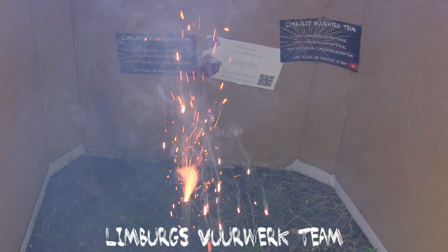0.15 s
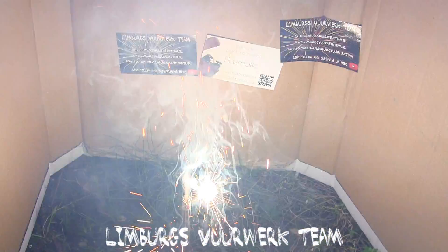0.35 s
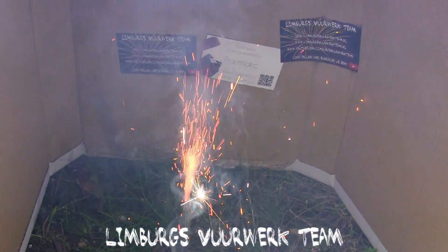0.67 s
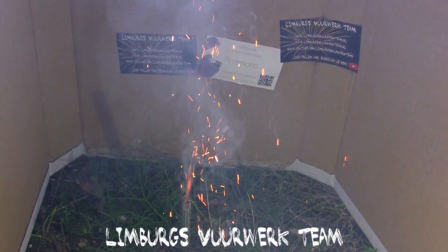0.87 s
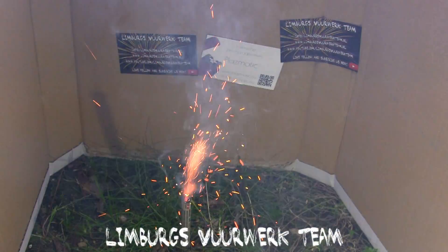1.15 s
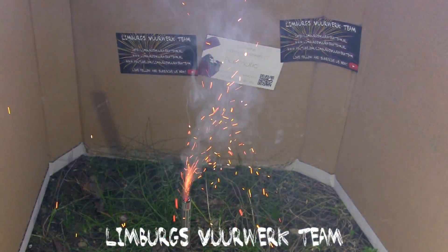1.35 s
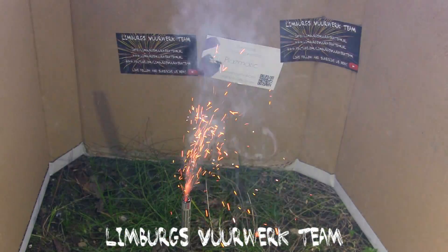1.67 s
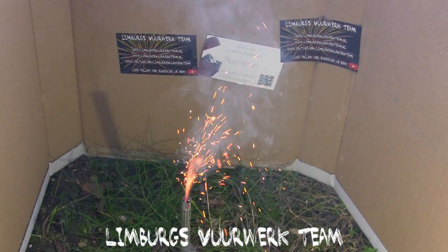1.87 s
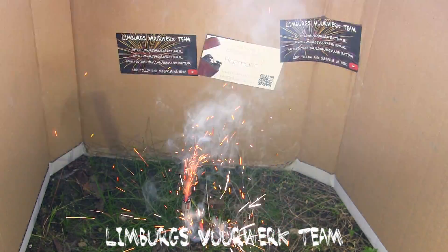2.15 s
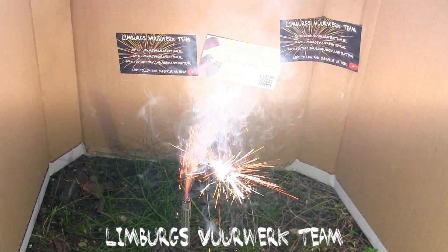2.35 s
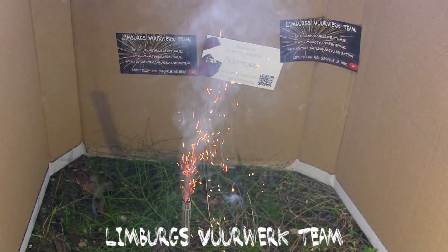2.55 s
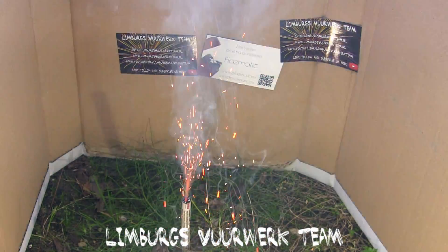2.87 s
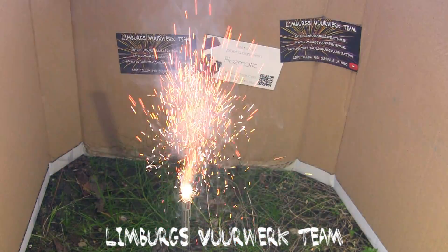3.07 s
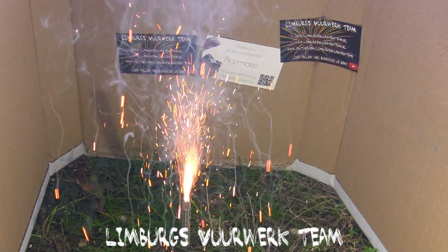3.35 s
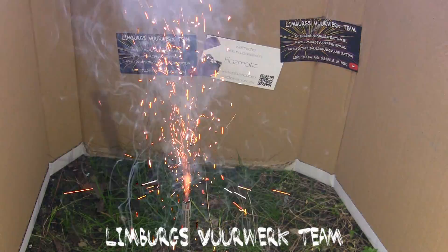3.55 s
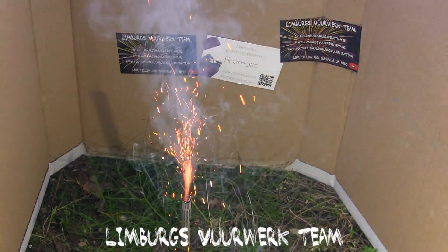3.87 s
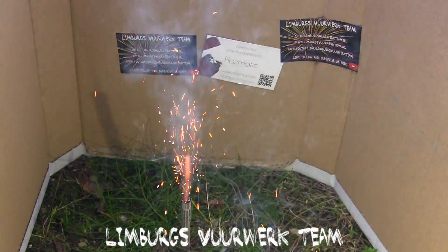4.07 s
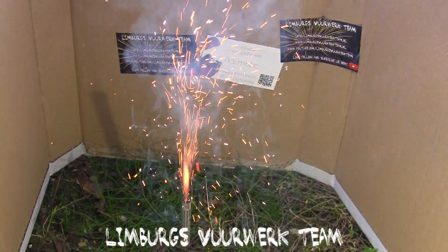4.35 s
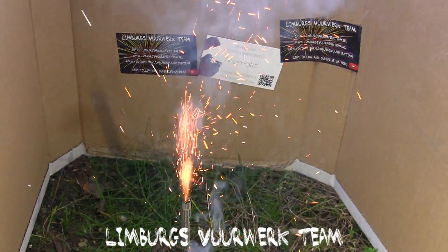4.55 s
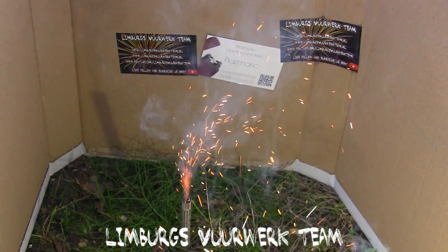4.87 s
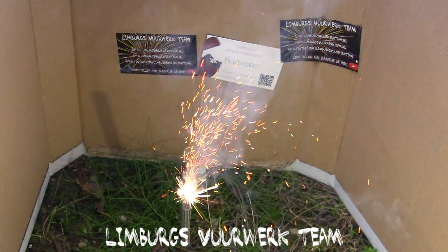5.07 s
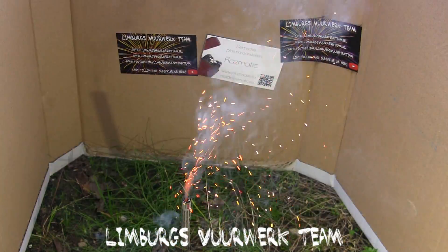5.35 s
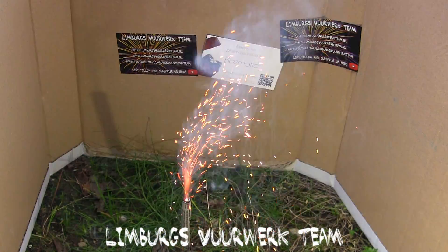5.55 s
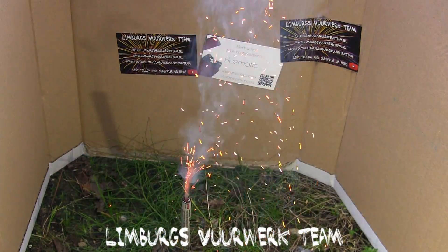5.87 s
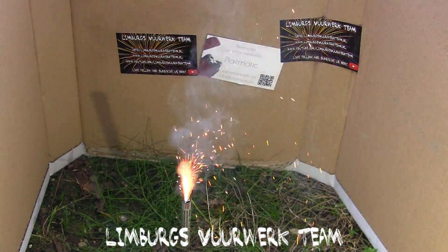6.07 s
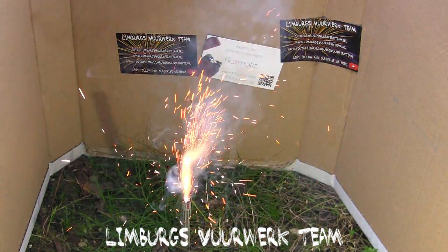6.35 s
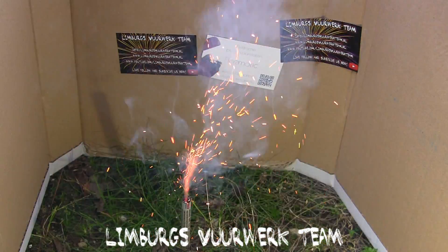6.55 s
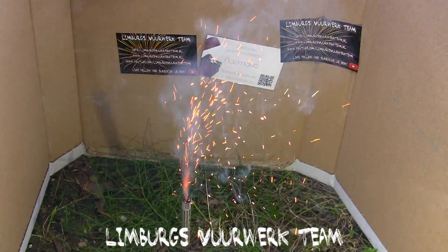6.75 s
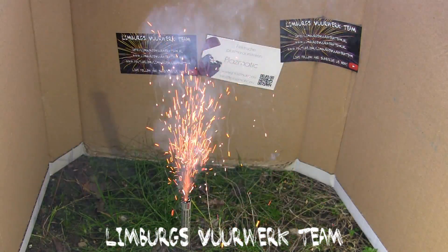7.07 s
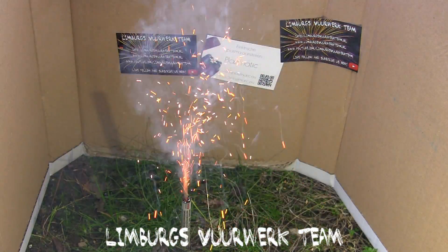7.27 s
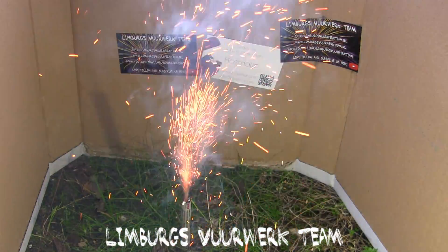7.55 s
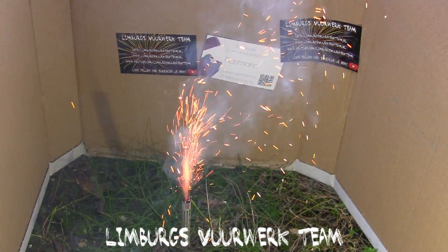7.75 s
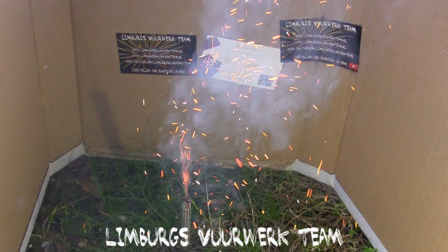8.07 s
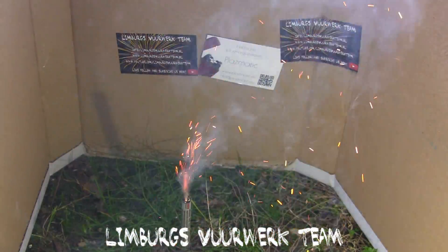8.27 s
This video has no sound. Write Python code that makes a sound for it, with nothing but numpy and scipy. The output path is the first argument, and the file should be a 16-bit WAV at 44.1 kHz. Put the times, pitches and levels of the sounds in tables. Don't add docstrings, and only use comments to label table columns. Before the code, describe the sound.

Continuous burning-gas hiss, bright at first and gradually duller, with irregular crackle over it. Dry snaps, brief fizzing spurts and hard little bursts jump well above the hiss. Sparse early pops give way to crowded crackling in the middle, a lull with only hiss and faint ticks, then another busy run. Outdoors on grass between card walls, close microphone, little bass, very short reflections.

```python
import sys
import numpy as np
from scipy import signal
from scipy.fft import rfft, irfft, next_fast_len
from scipy.io import wavfile
from scipy.ndimage import uniform_filter1d, map_coordinates

SR = 44100
rng = np.random.default_rng(int(sys.argv[2]) if len(sys.argv) > 2 else 0)


def gain_from_db(level_db):
    decades = np.asarray(level_db, float) / 20
    return 10 ** decades


def to_wav(s):
    ch = np.atleast_2d(s).T
    pcm = np.round(np.clip(ch, -1, 1) * 32767)
    wavfile.write(sys.argv[1], SR, pcm.astype(np.int16))


N = 371322

# [f/Hz, time to fall 60 dB/s]
YARD = [(200, 0.23), (450, 0.25), (900, 0.06), (1800, 0.021), (5000, 0.028)]
YARD_MS, YARD_DB = 15, -19
# [f/Hz, time to fall 60 dB/s]
BOX = [(200, 0.1), (450, 0.11), (800, 0.055), (2500, 0.057), (8000, 0.018)]
# [delay/ms, gain/1]
ECHOES = [
    (.29, -.12),
    (.39, -.19),
    (.59, .28),
    (.68, .07),
    (.98, -.18),
    (1.41, -.06),
    (2.18, .12),
]
# [t/s, level/dB]
JET = [(0, -44.5), (.2, -38), (.4, -41.5), (.9, -43), (1.3, -41), (1.7, -39.5), (2.3, -42), (2.9, -40.5),
       (3.3, -39), (3.9, -41), (5.3, -40.5), (6.0, -40.5), (6.7, -38.5), (7.3, -38.5), (7.9, -37),
       (8.13, -40.5), (8.22, -41.5), (8.42, -34.5)]
# [t/s, fizz over roar/dB]
MOUTH = [(0, 5.5), (.2, 3.5), (.45, 0), (2.9, -6), (5.3, -7.5), (6.1, -9.5), (7.1, -10), (8.42, -11.5)]
# [f/Hz, level per Hz/dB]
RUMBLE = [(90, -16), (170, -3.5), (350, 1.5), (700, -2), (1300, -76)]
# [f/Hz, level per Hz/dB]
ROAR = [(600, -2.5), (1100, -3.5), (1750, 3), (2200, -4.5), (2700, 2), (2920, -2.5), (3250, 6.5), (3650, 4),
        (3950, 1.5), (4600, -3), (5600, -4.5), (8000, -47)]
# [f/Hz, level per Hz/dB]
FIZZ = [(4500, -19), (5800, 4.5), (6600, 2.5), (7500, 3), (8700, 1), (10500, 0), (12000, -4.5), (14000, -3)]
# [f/Hz, width/Hz, full/dB, half burnt/dB, burnt down/dB]
TUBE = [(740, 110, 5, 3.5, -1), (3330, 730, -3.5, -0.5, 0.5), (4250, 320, -1, 3.5, -2),
        (5170, 570, -2, 4, -2.5), (6450, 1030, -5.5, 0.5, -6), (8300, 750, 0.5, 1, -1.5),
        (10100, 440, -1, 0.5, 1.5), (13100, 790, -5, 1.5, 0), (14900, 400, -7, -3, -2)]
GRAINS_PER_S, GRAIN_MS, GRAIN_SIZE = 2500, 0.2, 0.6

# [f/Hz, level per Hz/dB]
GUSH = [(500, -126), (1000, -4), (1700, 1), (2500, -2), (3500, 5), (4600, -1.5), (6500, -4), (8000, -14)]
# [f/Hz, level per Hz/dB]
SPRAY = [(4500, -34), (6000, -17), (7500, 3), (8700, -2), (10500, 0.5), (12000, -1.5), (13500, -3)]
SPUTTER_FIZZ_DB, SPUTTER_DULLS = 6.5, 0.55
# [t/s, start level/dB, length/ms]
SPITS = [(0.3038, -13.5, 16), (0.43, -5, 3.5), (1.0873, -15.5, 5.4), (1.9317, -17.5, 8), (2.9972, -11, 3.4),
         (3.2163, -11, 2.2), (3.2839, -14.5, 9.9), (3.5883, -9, 6.1), (3.9005, -19, 6.1),
         (3.1735, -21.5, 9.4), (4.2494, -11.5, 12), (4.5175, -18, 4.3), (4.7264, -16, 9.1),
         (4.818, -14, 8.1), (4.9415, -9.5, 4.2), (5.0163, -9, 5.4), (5.164, -16, 12.7), (6.4176, -10, 9.3),
         (6.4782, -13.5, 21), (6.7948, -11, 7.9), (6.8925, -3.5, 5.3), (7.174, -10.5, 3.8),
         (7.406, -19, 9.4), (7.4188, -7.5, 13), (7.5858, -4.5, 7), (7.7175, -11.5, 17)]
# [t/s, start level/dB, length/ms]
SNAPS = [(0.0247, -19.5, 110), (0.2848, -16, 20), (0.801, -13.5, 16.4), (1.2109, -12, 13.5),
         (1.561, -9.5, 22.5), (1.89, -11.5, 8.9), (2.2276, -10.5, 24), (3.104, -9.5, 12),
         (3.3812, -7, 11.3), (3.504, -11, 17), (3.6261, -11.5, 11), (3.7948, -10, 16.3), (4.1907, -15, 44),
         (4.2746, -13, 27), (4.6913, -10.5, 14), (4.924, -8.5, 15), (5.4607, -11, 12.4), (5.705, -13, 41),
         (6.242, -10.5, 12.5), (6.2955, -16.5, 29), (6.3749, -12.5, 33), (7.5946, -9.5, 16),
         (7.6706, -21, 17), (8.1036, -17, 17)]
# [t/s, start level/dB, length/ms]
FADES = [(0.1357, -15.5, 31), (0.244, -15.5, 13), (0.6283, -8.5, 13.3), (0.6594, -9.5, 32),
         (0.696, -15, 45), (2.9824, -28, 8.6), (3.4676, -18, 38), (3.521, -14.5, 16), (3.6797, -18.5, 46),
         (4.259, -22, 12), (4.3303, -17, 54), (4.5813, -11.5, 13.4), (4.607, -21, 39), (5.0906, -16.5, 31),
         (5.125, -20.5, 18), (5.473, -22, 31), (5.5265, -14, 18), (5.6598, -16.5, 16), (6.159, -16.5, 21.7),
         (6.1857, -23, 33), (6.509, -16.5, 15), (7.1143, -21.5, 23), (7.458, -19, 34), (7.5468, -16, 57),
         (7.8059, -23.5, 44), (8.4012, -13.5, 20)]
# [t/s, start level/dB, length/ms]
STEADIES = [(0.4642, -15, 11), (0.4825, -30, 14), (3.535, -21, 29), (3.483, -28, 9.5), (0.224, -10.5, 10.6),
            (0.315, -24.5, 29), (0.5004, -26, 18), (0.8434, -19.5, 5.1), (1.2667, -19, 15),
            (1.424, -30.5, 21), (1.7169, -24, 6.4), (2.9573, -21, 29), (3.0945, -12.5, 8.5),
            (3.1147, -21, 21), (3.89, -27, 12.2), (3.1339, -33, 73), (3.389, -24.5, 67),
            (3.7332, -25.5, 15), (4.378, -26, 56), (4.4643, -22, 39), (4.9844, -18.5, 9.9),
            (5.2752, -17.5, 27), (5.3513, -14.5, 5.9), (5.741, -23.5, 20), (6.2638, -22, 19),
            (6.426, -24, 25), (6.489, -22, 16), (7.0814, -17, 5.6), (7.1797, -23.5, 22),
            (7.2515, -26.5, 19.4), (7.4417, -17.5, 11), (7.9912, -12.5, 6.6), (7.9946, -16, 32.6)]
# [t/s, start level/dB, length/ms]
SWELLS = [(0.432, -20, 11.3), (0.472, -27.5, 29), (0.726, -20, 10), (0.7367, -31, 25), (2.108, -16, 10.6),
          (3.087, -19.5, 6.7), (3.8614, -25, 13.3), (4.7128, -12, 4.6), (4.7322, -31.5, 20),
          (4.7662, -18.5, 6.2), (4.978, -20, 5.3), (5.6028, -18, 4.1), (5.7615, -30, 20),
          (6.2884, -22, 4.4), (7.91, -31, 10), (7.967, -20, 17), (8.374, -20, 10)]
# [t/s, start level/dB, length/ms]
HISSES = [
    (0.0247, -2, 4.4),
    (0.26, -7.5, 10.5),
    (1.8268, -17.5, 6.9),
    (2.12, -35, 7.8),
    (2.4415, -8, 7.1),
    (4.7163, -15, 5.2),
    (5.5939, -18, 15),
    (6.3966, -8.5, 19),
    (6.7787, -12, 4.7),
]
# [t/s, start level/dB, length/ms]
PUFFS = [(0.419, -8.5, 11.7), (0.438, -18, 23), (1.7677, -13.5, 2), (4.6609, -24, 35), (5.0296, -12.5, 3.2),
         (5.3286, -7.5, 4.4), (5.52, -18, 7.2), (6.0943, -16.5, 20), (7.2224, -17, 15), (7.6155, -23.5, 43),
         (7.7269, -6, 5.1), (7.9539, -14.5, 5.6), (8.0868, -14, 15)]
# [t/s, peak/dB]
TICKS = [(0.1989, -11), (0.339, -19), (0.767, -2), (0.8944, -17), (4.1626, -14), (4.1785, -22),
         (4.308, -12), (4.5438, -8), (7.504, -12), (7.5327, -16), (7.648, -21), (7.6889, -13),
         (7.7643, -18), (7.8834, -22), (8.0414, -21),
         (5.608, -12), (0.056, -10), (0.073, -13), (0.1044, -10), (0.316, -7), (0.482, -14),
            (0.4955, -9), (0.7454, -14), (0.7824, -9), (0.789, -3), (3.4443, -8), (3.6693, -13),
            (3.679, -9), (3.71, -16), (3.8715, -26), (4.372, -12), (4.4637, -17), (4.617, -9),
            (4.7741, -3.5), (4.831, -14), (5.525, -2), (5.5444, -14), (5.766, -11), (5.7815, -13),
            (6.164, -12), (6.195, -14), (6.507, -11.5), (7.136, -11), (7.189, -21), (7.27, -11),
            (7.809, -18), (7.92, -1.5)]
# [t/s, peak/dB]
GLINTS = [(0.9627, -18), (1.2979, -12), (1.3764, -29), (1.398, -19), (1.7933, -30), (1.9619, -27),
          (1.9819, -16), (2.1794, -31), (2.2794, -13), (2.4029, -30), (2.5157, -16), (2.693, -15),
          (2.7142, -30), (2.837, -22), (2.935, -11.5), (5.8137, -21), (5.892, -17), (6.6493, -20),
          (6.697, -15), (6.764, -21),
          (.148, -12), (.506, -9), (.515, -10), (.747, -15), (3.449, -17), (3.635, -21), (4.483, -15),
            (4.7, -18), (4.729, -15), (6.2953, -3), (0.086, -9), (0.3671, -13), (0.5372, -15),
            (0.8114, -23), (1.1024, -11), (1.4374, -32), (1.473, -13), (2.4534, -11), (3.017, -24),
            (3.059, -11), (3.1603, -9), (3.2464, -12), (3.2584, -17), (3.2714, -15), (3.317, -7.5),
            (3.3643, -23), (3.3754, -16), (3.8382, -13), (3.9654, -17), (4.169, -16), (5.8284, -31),
            (6.1124, -29), (6.1325, -33), (6.234, -7), (7.1546, -26), (8.0724, -30), (8.1874, -43)]
# [t/s, peak/dB]
SMOULDERS = [(.641, -21), (0.6597, 2), (.688, -16), (2.992, -15), (3.469, -13), (3.877, -18), (4.386, -20),
             (4.428, -20), (4.754, -17), (5.479, -19), (5.487, -14), (5.543, -16), (5.719, -12),
             (5.745, -16), (5.755, -18), (5.771, -12), (6.168, -8), (6.181, -17), (6.21, -15), (7.204, -16),
             (7.258, -8), (7.469, -8), (7.601, -16), (7.816, -17), (7.825, -22)]
TICK_CREST_DB, TICK_CHANGE_DB = 12, -6.5
TICK_MS, GLINT_MS = 3, 3.3
TICK_FIZZ_DB, GLINT_FIZZ_DB, SMOULDER_FIZZ_DB = 0.5, 6, -11

# [t/s, peak/dB, crack f/Hz, thump f/Hz, thump over crack/dB]
BIG_STARS = [(0.6295, -2, 1610, 550.0, -12.5), (1.2101, -2, 1430.0, 344, -7),
             (1.5615, -5.5, 1270.0, 416, -5.5), (1.8245, -1.5, 2120, 1160, 2),
             (2.1124, -5.5, 1750, 1030, 0), (2.2278, 1, 1310, 374, -11), (2.4409, -3, 1466, 370.0, -7),
             (2.958, -2.5, 1180, 820, -2.5), (2.9834, -4.0, 2110.0, 1190, -4),
             (3.7944, -7.5, 2230, 664, -2), (4.2496, 1, 1320, 705, -8.5), (4.2744, -1, 1470, 338, -11),
             (4.5821, 0, 1780, 353, -5.5), (4.6908, 0.5, 1530, 312, -12.5), (4.7257, -0.5, 1590, 510, -8.5),
             (4.9229, -2, 1300, 358, -10.5), (4.983, -1.5, 2260.0, 1190, -3.5),
             (6.3992, -5, 1430, 374, -14), (6.8926, 3, 1200, 574, -13), (7.421, -1, 1330, 560.0, -11),
             (7.5951, -5.5, 1870, 795, -1), (7.7176, -5.5, 2050, 630.0, 3),
             (7.9853, -1.5, 1580, 433, -11.0), (8.1041, -9, 1390.0, 750.0, -4)]
# [overtone f/Hz, overtone over crack/dB, ground bounce/ms, length/ms]
BIG_SHAPES = [(3200, -6, 2.06, 1.7), (2770, -8.0, 1.94, 1.8), (3700, -2.5, 1.37, 1.1),
              (3870, -12, 2.04, 1.64), (3800, -8, 2.7, 0.79), (2780, -8, 1.51, 1.3),
              (4240, -11.5, 1.66, 2.6), (4170.0, -18.5, 2.17, 1.9), (3620, -12.5, 1.56, 1.5),
              (2620, -3.5, 2.5, 2.7), (3190.0, -11, 2.17, 1.4), (3230, -4.5, 2.38, 1.06),
              (3300, -19, 2.2, 0.99), (3540.0, -7.5, 2.35, 0.83), (3200, -11, 2.2, 1.8),
              (2320, -1.5, 1.6, 1.83), (3270.0, -17, 2.46, 1.5), (2300, -5, 2.27, 1.5),
              (4460, -9, 2.34, 1.05), (2040.0, -5.5, 2.38, 1.52), (3300, -3, 2, 1.6),
              (4600.0, -19.0, 2.37, 1.2), (3360.0, -14, 1.6, 1.95), (3100, -3, 2.5, 0.81)]
# [t/s, peak/dB, crack f/Hz, thump over crack/dB]
SMALL_STARS = [(0.025, -19.5, 1410, -3), (0.4191, -9, 1610, -2.5), (0.66, -17.5, 1640, 8),
               (1.2671, -9.5, 1480, -4.5), (3.3811, -10, 1550, -13), (3.5888, -8.5, 2350, -9.5),
               (3.6263, -9.5, 1310, -15), (3.733, -15.5, 1540, -7.5), (4.192, -27.5, 1550, 7),
               (4.331, -12.5, 1590, -9.5), (4.7128, -18, 1700, 8), (5.163, -18, 1730, -8.5),
               (5.2756, -13.5, 2320, 1), (5.352, -8, 1260, -5), (5.46, -12.5, 1730, -20),
               (5.6035, -10.5, 2280, -8), (5.659, -18.5, 1640, -2), (5.7047, -14.5, 2280, -5.5),
               (6.0958, -15, 1740, -38), (6.1599, -6.5, 1660, -37), (6.2411, -9, 1550, -5.5),
               (6.3759, -11.5, 1750, -23), (6.4788, -3.5, 1620, -6), (6.779, -11.5, 1410, -10),
               (7.222, -11.5, 1780, -35), (7.4422, -9.5, 1740, -15), (7.5486, -9, 2040, -9),
               (7.6714, -10, 1570, -15), (8.087, -28, 1620, -7), (8.3751, -12, 1530, -28)]
SMALL_THUMP_HZ, THUMP_SCATTER = 379, 0.31
# [t/s, peak/dB, crack f/Hz, thump f/Hz, thump over
# crack/dB]
MORE_STARS = [
    (0.4405, -11.5, 1520, 380, -7),
    (0.7279, -14, 1480, 416, -3.5),
    (1.8417, -25, 2200, 900, -5),
    (3.1049, -8, 1620, 387, -8),
    (3.174, -18, 1690, 397, -3),
    (3.504, -18, 1510, 415, -1),
    (3.5213, -14, 1700, 400, -21),
    (5.3279, -15.5, 1350, 407, -2.5),
    (6.796, -25.5, 1500, 368, 5.5),
    (7.9911, -4.5, 1470, 396, -3),
]

# [f/Hz, gain/dB]
MICROPHONE = [(11000, -0.5), (13000, -2), (14300, -16), (15000, -13), (15450, -32), (16400, -40)]
# [f/Hz, width/Hz, gain/dB]
COLOURING = [(1700, 910, 1), (2640, 230, 0.5), (3570, 160, -1.5), (4210, 430, 1), (5890, 360, 2.5),
             (6400, 280, 1), (7520, 280, -3), (9250, 280, 2.5), (11500, 340, -1.5), (11850, 300, -1),
             (12500, 350, 1),
             (3400, 100, -2), (3900, 130, -3), (6500, 130, 2.5), (8800, 200, 1), (10150, 130, 2),
        (14150, 200, 4), (3650, 130, 1.3), (5200, 160, 1.5), (5650, 200, -1.3), (10500, 150, -2),
        (12450, 220, -2.3), (13650, 220, -2.5), (15200, 500, -5)]


def unit(x):
    return x / np.sqrt(np.mean(x ** 2) + 1e-20)


def along(points, hz):
    f, v = np.transpose(points)
    return np.interp(np.log(hz + 1), np.log(f + 1), v)


def wobble(rate):
    return map_coordinates(rng.standard_normal(N // 40), [np.arange(N) * rate / SR])


def filtered(x, response):
    m = next_fast_len(N + 8192)
    return irfft(rfft(x, m) * response(np.fft.rfftfreq(m, 1 / SR)), m)[..., :N]


def bumps(rows, hz):
    return gain_from_db(sum(db * np.exp(-((hz - c) / w) ** 2) for c, w, db in rows))


def noise(spectrum, patchy_db):
    z = signal.stft(rng.standard_normal(N), nperseg=128)[2]
    field = uniform_filter1d(rng.standard_normal(z.shape), size=3, axis=0)
    field = uniform_filter1d(field, size=4, axis=1)
    patched = signal.istft(z * gain_from_db(patchy_db * unit(field)), nperseg=128)[1][:N]
    return unit(filtered(patched, lambda hz: gain_from_db(along(spectrum, hz))))


def scattered_tail(x, walls, delay_ms):
    hz, t, z = signal.stft(rng.standard_normal((4, SR // 4)), SR, nperseg=128)
    decay = gain_from_db(-60 * t / along(walls, hz)[:, None])
    tails = signal.istft(z * decay, SR, nperseg=128)[1]
    tails = tails / np.linalg.norm(tails, axis=1, keepdims=True)
    place = np.arange(N) // (SR // 9) % len(tails) == np.arange(len(tails))[:, None]
    tails = np.pad(tails, ((0, 0), (round(delay_ms * SR / 1000), 0)))
    return signal.oaconvolve(x * place, tails, axes=1).sum(axis=0)[:N]


def echoes(x):
    def response(hz):
        copies = sum(gain * np.exp(-2j * np.pi * hz * ms / 1000) for ms, gain in ECHOES)
        return 1 + copies / np.sqrt(1 + (hz / 11000) ** 4)
    return filtered(x, response)


def jet():
    t = np.arange(N) / SR
    roar_db = np.interp(t, *np.transpose(JET))
    fizz_db = roar_db - 0.3 + np.interp(t, *np.transpose(MOUTH))
    flutter = wobble(27)
    when, odds = rng.random((2, 400))
    sizes = gain_from_db(-5 * np.log(odds + 0.11))
    sparks = np.bincount((when * (N - 1)).astype(int), sizes, N)
    die_away = gain_from_db(-60 * np.arange(SR // 50) / SR / 0.0026)
    sparks = signal.fftconvolve(sparks, die_away)[:N]
    roar = gain_from_db(roar_db + 1.2 * flutter + 0.7 * wobble(11) + 0.2 * wobble(150)) * noise(ROAR, patchy_db=1.6)
    fizz = gain_from_db(fizz_db + 1.0 * flutter + 1.1 * wobble(60)) * noise(FIZZ, patchy_db=2.5)
    rumble_db = -43.0 + 0.71 * roar_db + 0.28 * flutter + 1.6 * wobble(12.0)
    rumble = gain_from_db(rumble_db) * noise(RUMBLE, patchy_db=6.0)
    return roar * (1 + 0.064 * sparks) + fizz * (1 + 1.6 * sparks) + rumble


def tube(x):
    burnt = 2 * np.arange(N) / N
    out = np.zeros(N)
    for k in range(3):
        rows = [(row[0], row[1], row[2 + k]) for row in TUBE]
        stage = filtered(x, lambda hz: bumps(rows, hz))
        out += np.maximum(1 - np.abs(burnt - k), 0) * stage
    return out


def grit():
    when, odds = rng.random((2, round(GRAINS_PER_S * N / SR)))
    grains = np.bincount((when * (N - 1)).astype(int), -np.log(odds + .01), N)
    die_away = np.exp(-np.arange(SR // 200) * 1000 / SR / GRAIN_MS)
    return unit(1 + GRAIN_SIZE * signal.fftconvolve(grains, die_away)[:N])


def sputter():
    roar, fizz = np.zeros((2, N + SR))
    sparks = [(s, db - TICK_CREST_DB, TICK_MS) for s, db in TICKS]
    glints = [(s, db - TICK_CREST_DB, GLINT_MS) for s, db in GLINTS]
    dull = [(s, db - TICK_CREST_DB, TICK_MS) for s, db in SMOULDERS]
    # (events, level change over the length dB, extra fizz dB)
    kinds = [(SPITS, -20.5, 1), (SNAPS, -23, -0.11), (FADES, -12.5, 0.091), (STEADIES, -2, -0.16),
             (SWELLS, 5.5, 1), (HISSES, -19, 5.5), (PUFFS, -21.5, -10.5),
             (sparks, TICK_CHANGE_DB, TICK_FIZZ_DB), (glints, TICK_CHANGE_DB, GLINT_FIZZ_DB),
             (dull, TICK_CHANGE_DB, SMOULDER_FIZZ_DB)]
    for rows, change_db, extra_db in kinds:
        for s, db, ms in rows:
            through = np.arange(round(ms * SR / 1000)) / (ms * SR / 1000)
            level = gain_from_db(db + change_db * through)
            sinking_db = np.interp(s, *np.transpose(MOUTH))
            fizz_db = SPUTTER_FIZZ_DB + SPUTTER_DULLS * sinking_db + extra_db
            share = 1 / (1 + gain_from_db(2 * fizz_db))
            start = round(s * SR)
            roar[start:][:len(level)] += level * np.sqrt(share)
            fizz[start:][:len(level)] += level * np.sqrt(1 - share)
    roar, fizz = uniform_filter1d(np.array([roar[:N], fizz[:N]]), size=24)
    splutter = 1.3 * wobble(300)
    lows = np.abs(uniform_filter1d(roar, size=130)) ** 1.512
    body, spray = noise(GUSH, patchy_db=1.8), noise(SPRAY, patchy_db=1.5)
    push = lows * gain_from_db(-2.0 + 0.81 * wobble(91)) * noise(RUMBLE, patchy_db=2.5)
    hiss = roar * gain_from_db(-0.58 + splutter) * body + fizz * gain_from_db(-5.0 + splutter) * spray
    return hiss, push


def pops():
    out, t = np.zeros(N + SR), np.arange(SR // 20) / SR
    small = []
    for s, db, hz, low_db in SMALL_STARS:
        thump_hz = SMALL_THUMP_HZ * np.exp(THUMP_SCATTER * rng.normal())
        small.append((s, db, hz, thump_hz, low_db))
    small += MORE_STARS
    scatter = rng.standard_normal((len(small), 2))
    usual = [(star[2] * (2.23 + 1.2 * a), -8, 1.835 * np.exp(0.3 * b), 1.6)
             for star, (a, b) in zip(small, scatter)]
    swell = 1 - np.exp(-t / 0.0001)
    for star, shape in zip(BIG_STARS + small, BIG_SHAPES + usual):
        s, db, crack_hz, thump_hz, thump_db = star
        over_hz, over_db, bounce_ms, ms = shape
        tone = np.sin(2 * np.pi * crack_hz * t) + gain_from_db(over_db) * np.sin(2 * np.pi * over_hz * t)
        crack = np.exp(-(t * 1000 / ms) ** 7.4) * tone
        thump = gain_from_db(thump_db + 7.5 - 60 * t * thump_hz / 3.87) * np.sin(2 * np.pi * thump_hz * t)
        burst = gain_from_db(db - 1.5) * swell * (crack + thump)
        out[round(s * SR):][:len(t)] -= burst
        out[round((s + bounce_ms / 1000) * SR):][:len(t)] -= 0.22 * burst
    return out[:N]


def scene():
    hiss, push = sputter()
    stars = pops()
    gushes = hiss * grit() + push
    near = scattered_tail(gain_from_db(-13.5) * gushes + gain_from_db(-17.0) * stars, BOX, delay_ms=2.8)
    fountain = echoes(tube(jet() + gushes))
    far = gain_from_db(YARD_DB) * scattered_tail(stars + push, YARD, YARD_MS)
    return (fountain + stars + near + far)[None]


def roll_off(x):
    return signal.sosfilt(signal.butter(12, 16450, fs=SR, output="sos"), x)


def record(dry):
    bass_cut = signal.butter(2, 190, "high", fs=SR, output="sos")
    thin = signal.sosfilt(bass_cut, signal.sosfilt(bass_cut, dry))
    soft = thin / (1 + np.abs(thin / .96) ** 5) ** (1 / 5)
    self_noise = gain_from_db(-88) * noise([(20, -3), (130, 1), (300, -30)], patchy_db=3)
    last_cut = signal.butter(2, 125, "high", fs=SR, output="sos")
    heard = signal.sosfilt(last_cut, soft) + self_noise
    coloured = filtered(heard, lambda f: gain_from_db(along(MICROPHONE, f)) * bumps(COLOURING, f))
    hz, _, z = signal.stft(coloured, SR, nperseg=1024)
    strength = uniform_filter1d(np.abs(z), size=25, axis=1)
    threshold = gain_from_db(along([(14300, -94), (14500, -89), (15400, -86)], hz))[:, None]
    kept = (hz[:, None] < 13650) | (strength > threshold)
    mix = signal.istft(z * kept, SR, nperseg=1024)[1][:, :N]
    return roll_off(mix)


dry = scene()
out = record(dry)
to_wav(out)
```